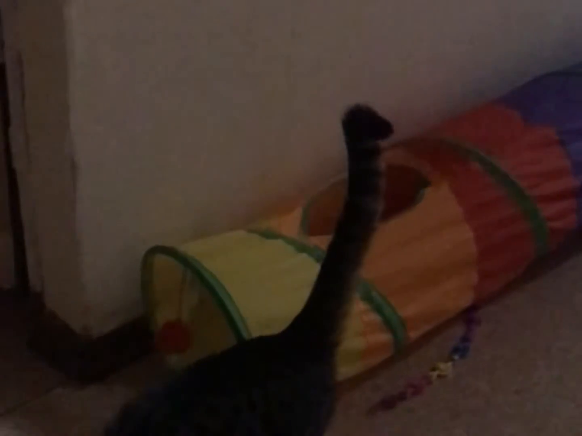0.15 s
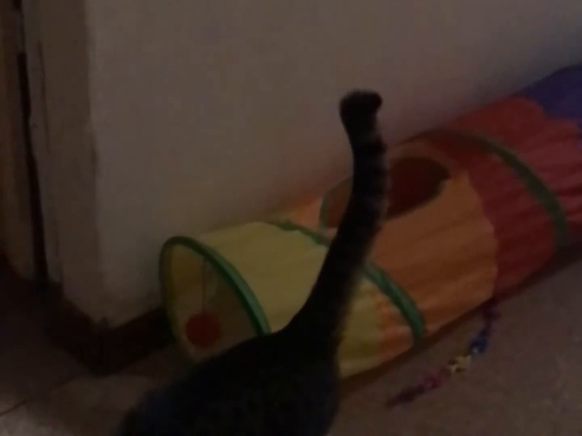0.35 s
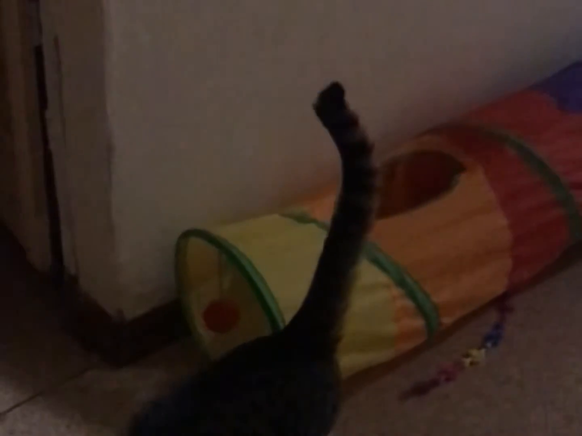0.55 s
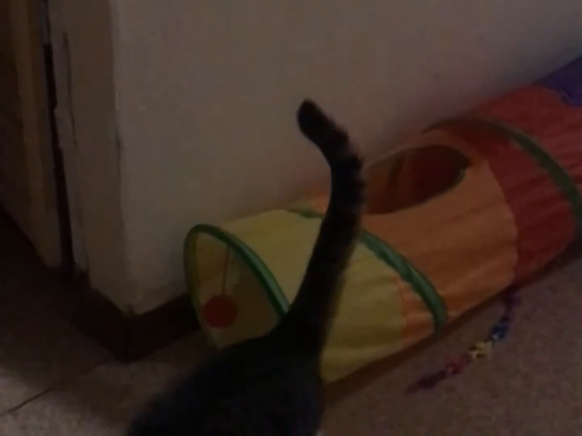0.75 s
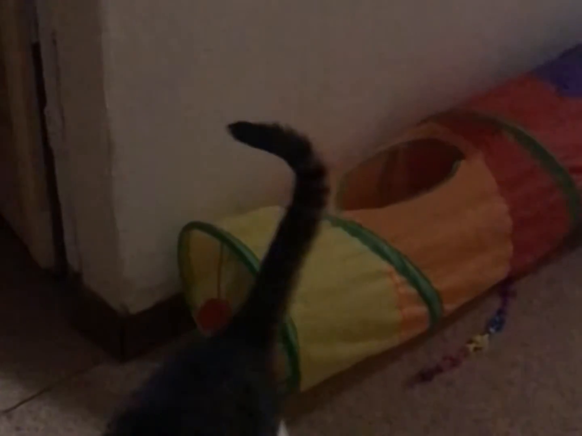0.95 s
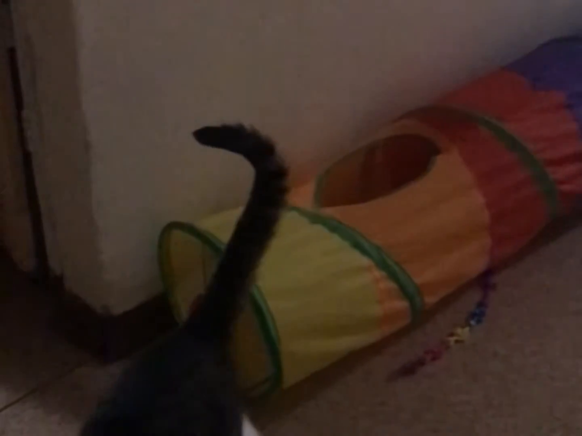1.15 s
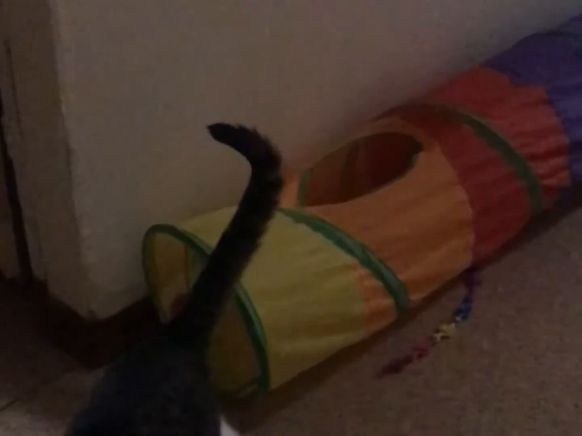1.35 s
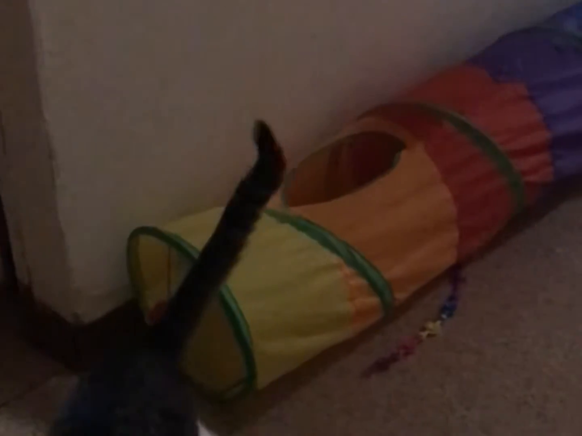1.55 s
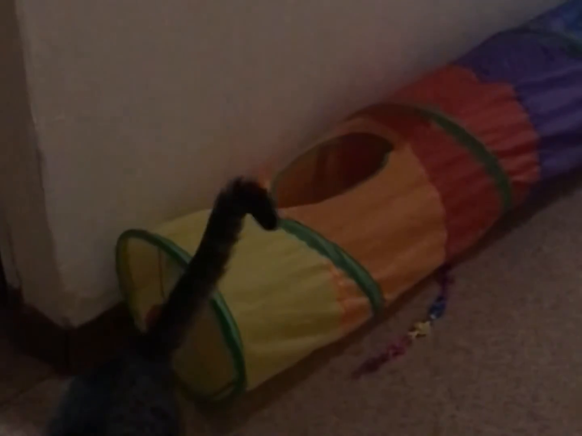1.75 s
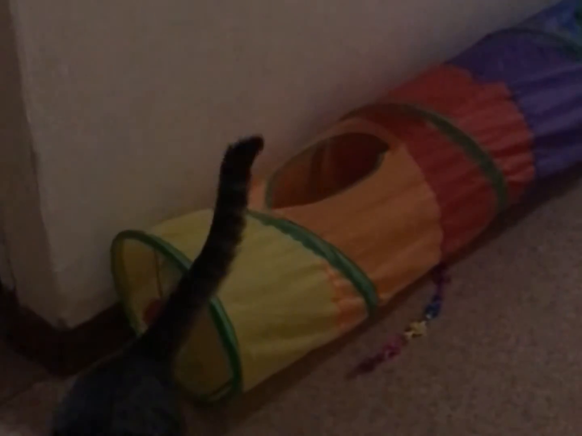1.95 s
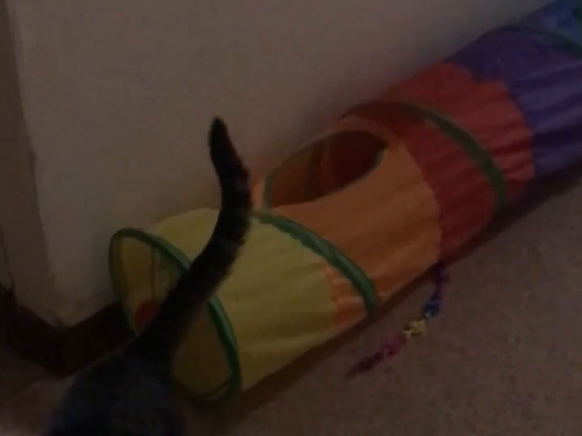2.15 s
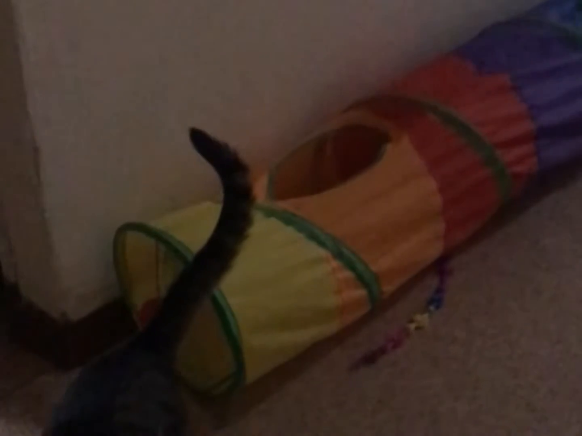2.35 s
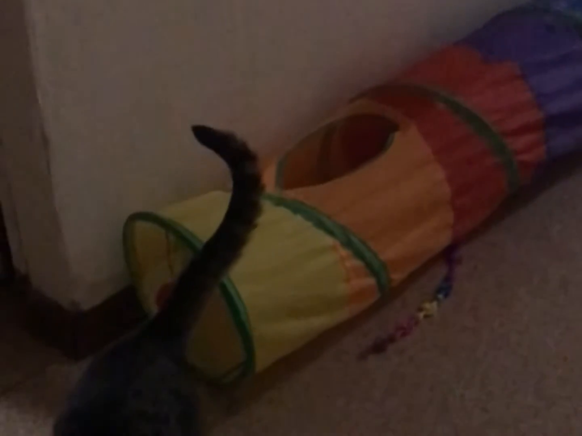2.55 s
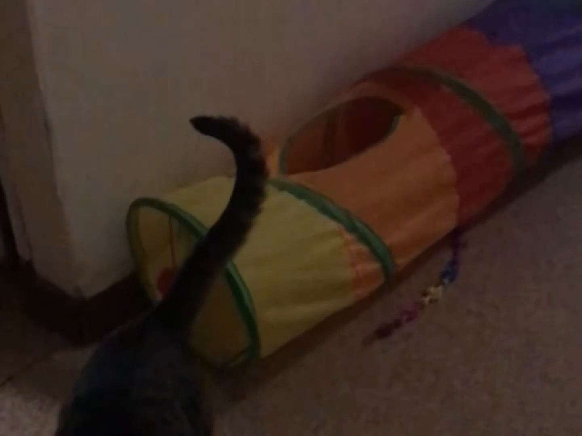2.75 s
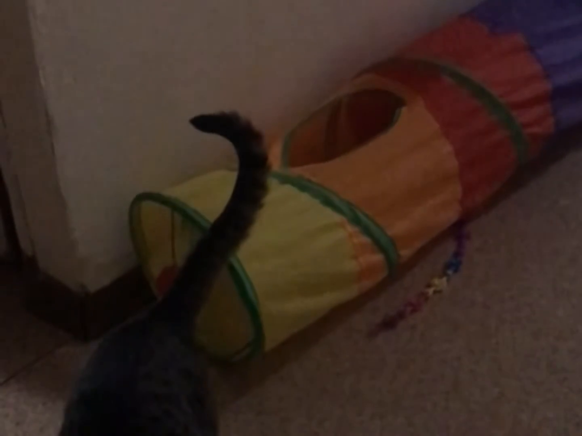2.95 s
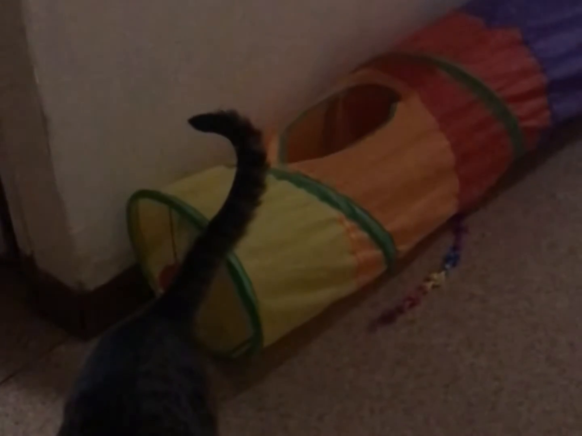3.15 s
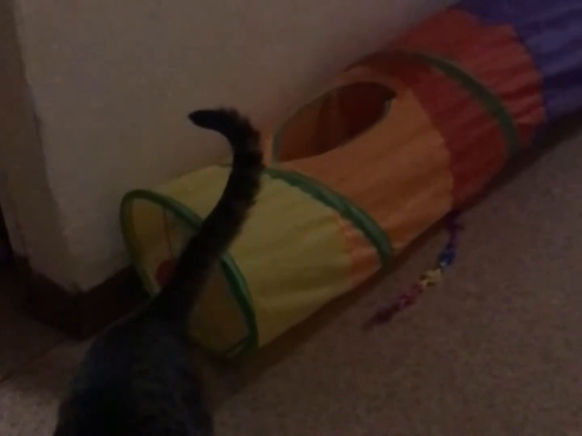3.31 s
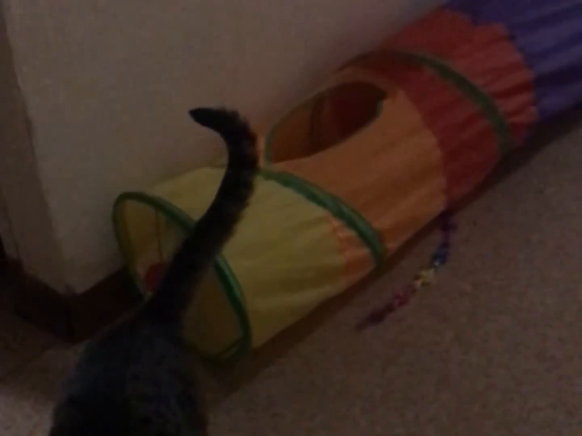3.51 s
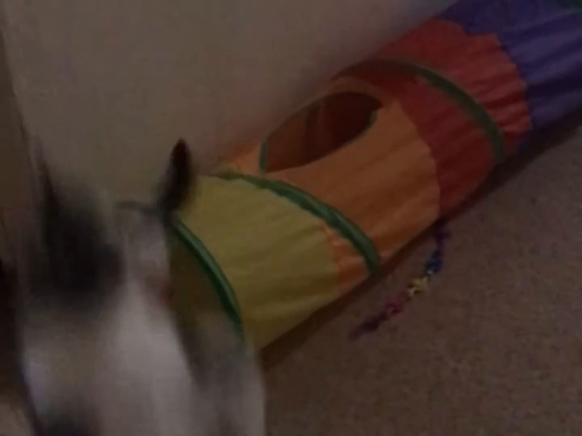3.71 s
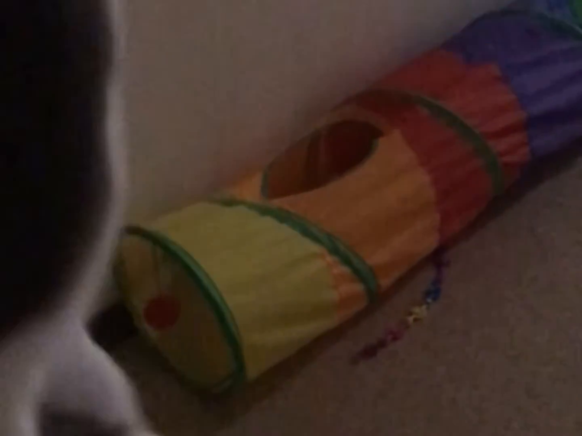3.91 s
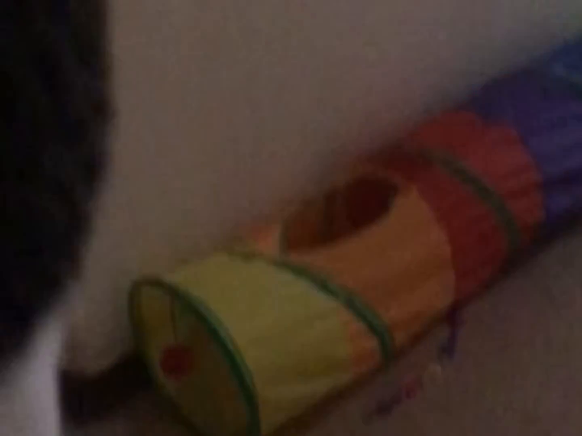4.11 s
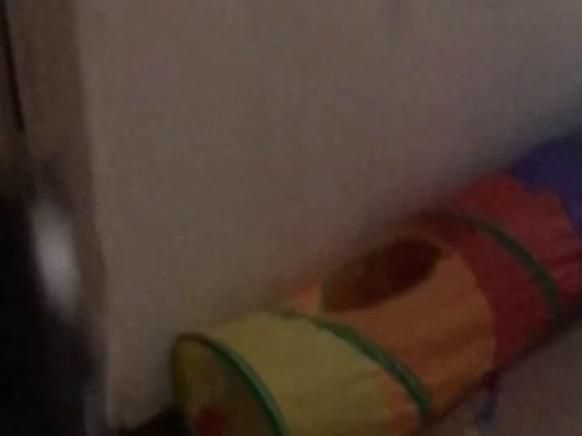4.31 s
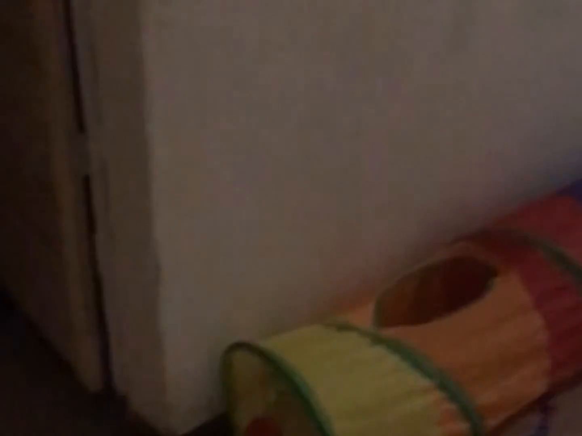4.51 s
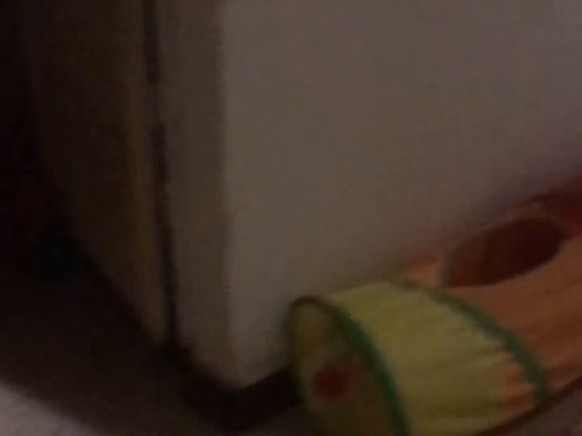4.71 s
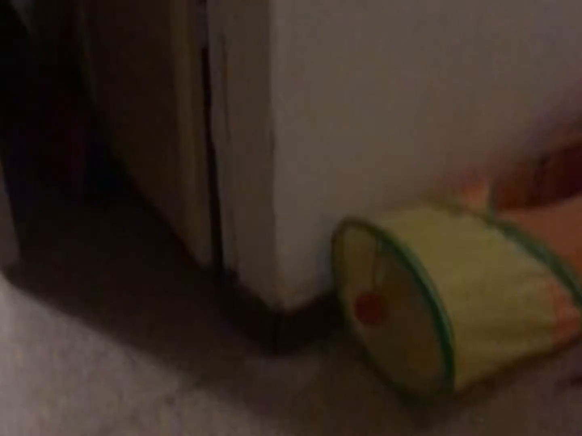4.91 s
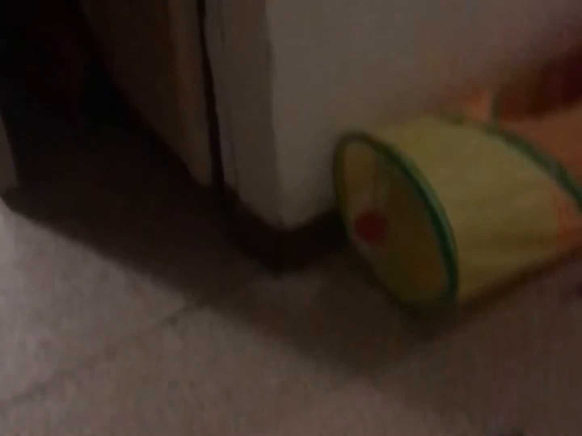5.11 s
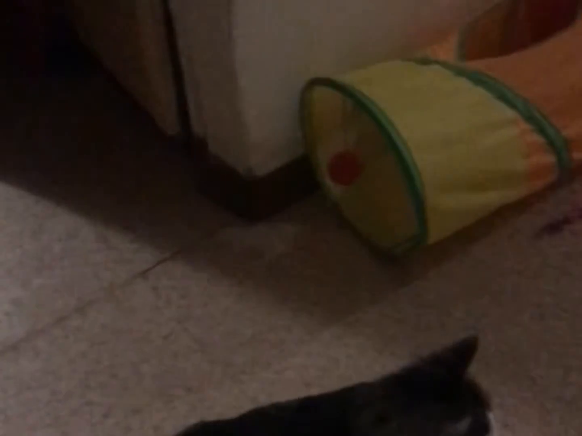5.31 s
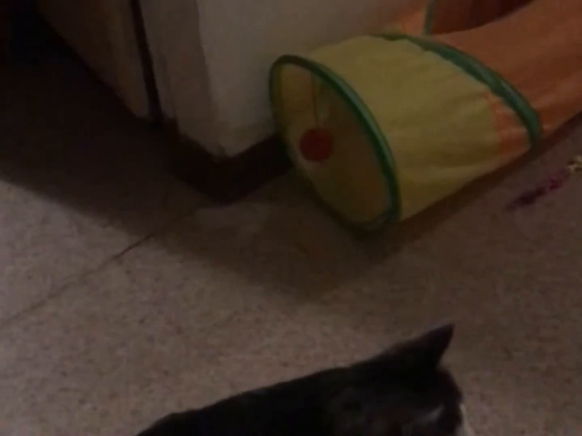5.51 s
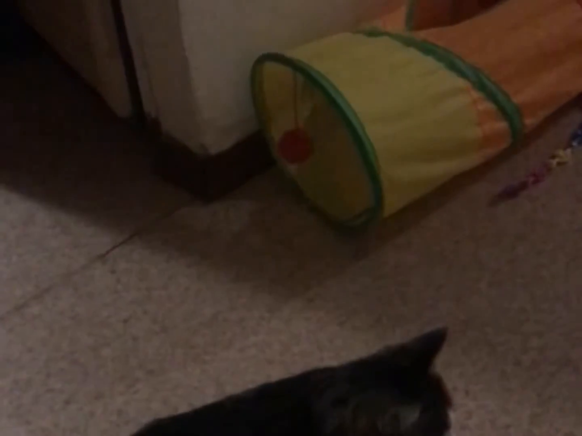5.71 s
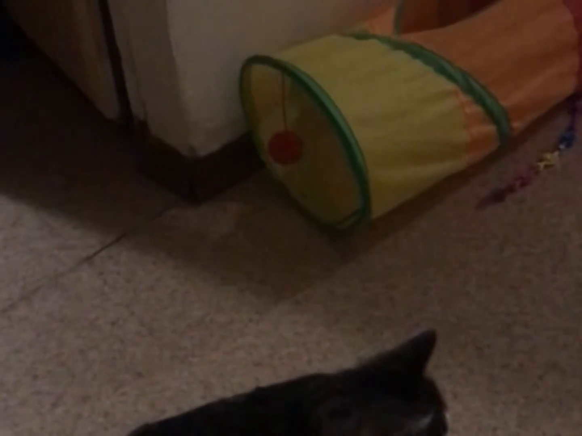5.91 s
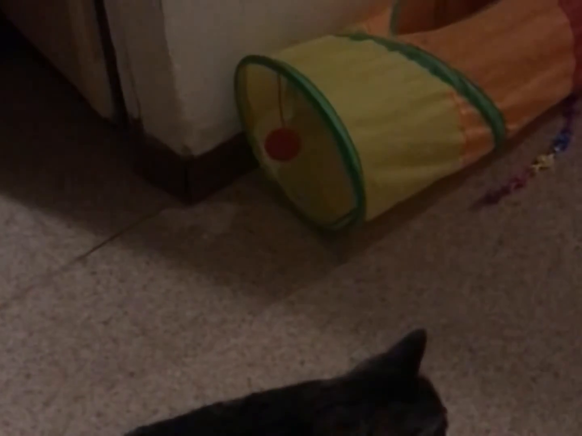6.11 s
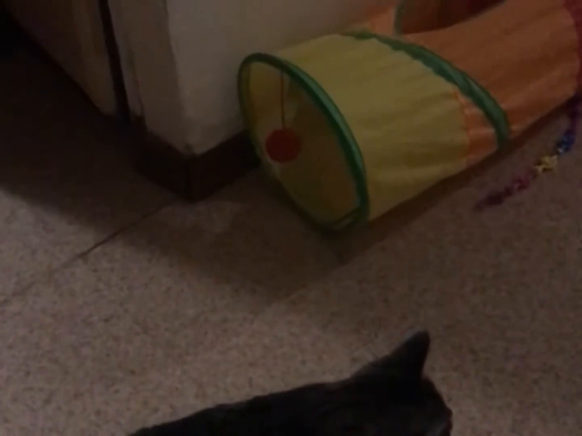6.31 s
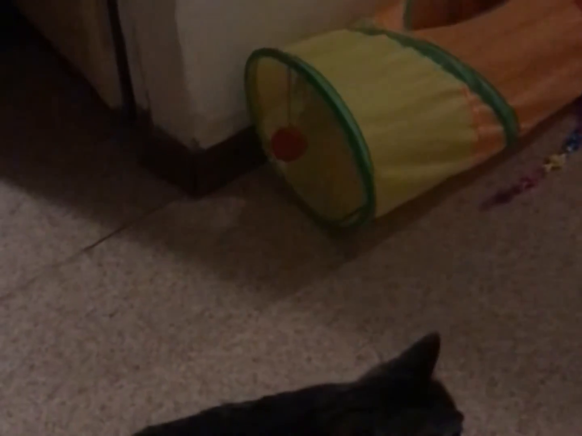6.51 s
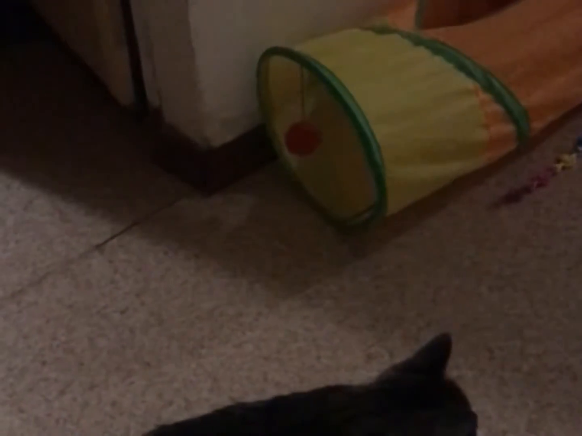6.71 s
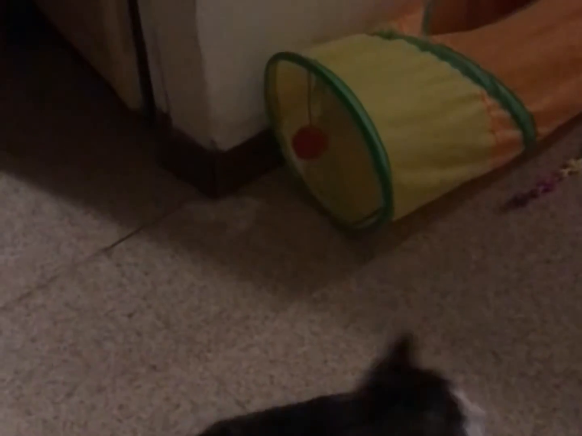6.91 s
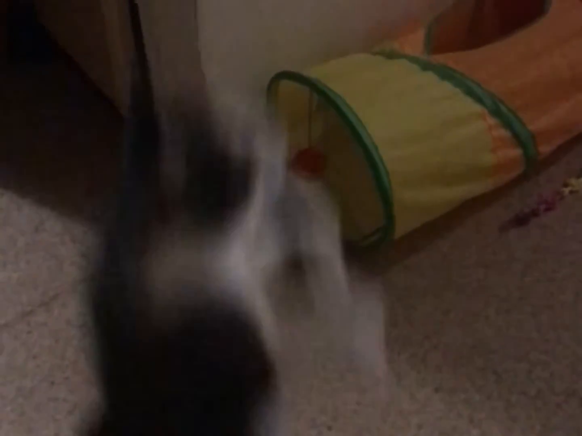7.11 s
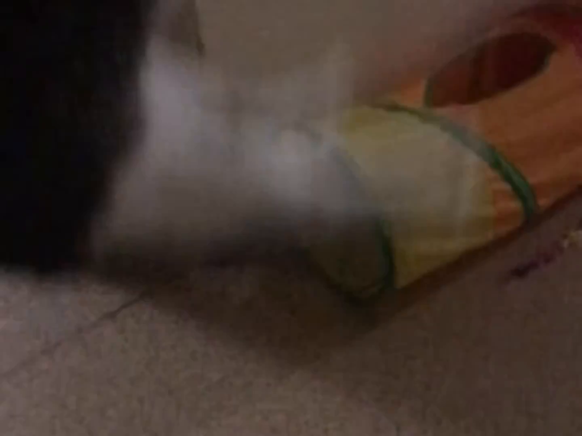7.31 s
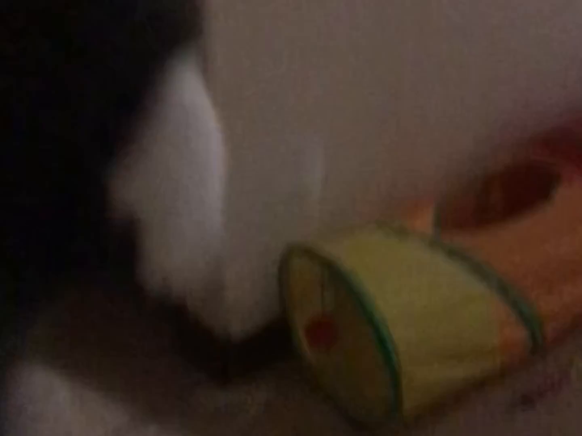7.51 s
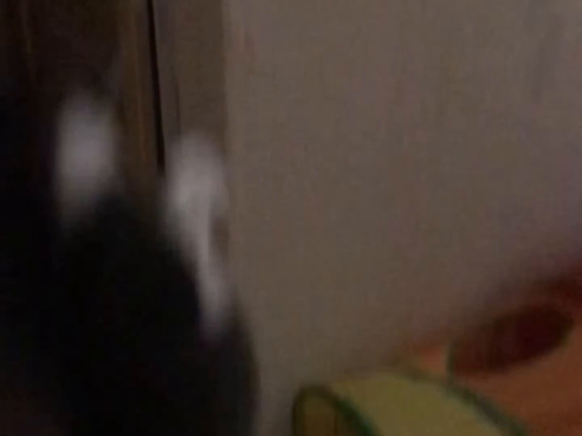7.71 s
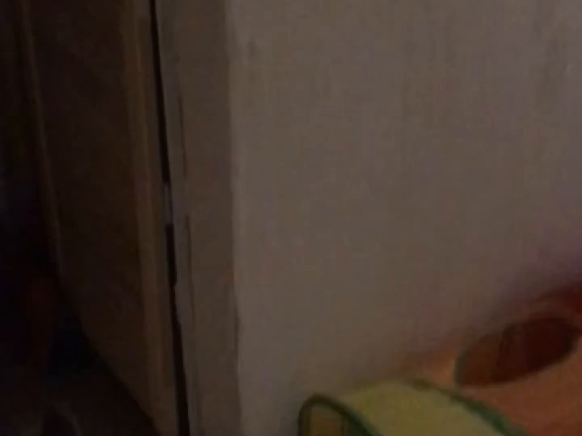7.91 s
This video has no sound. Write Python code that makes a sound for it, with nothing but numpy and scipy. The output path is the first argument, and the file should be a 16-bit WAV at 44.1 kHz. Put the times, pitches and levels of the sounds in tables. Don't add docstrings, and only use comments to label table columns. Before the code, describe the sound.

Close in a hard hallway, cats make tiny bright claw ticks, cloth snaps and faint fur rustle over low air hiss. Soft paw thuds lead to a sudden hollow door bang with latch clatter just past the middle. Quiet scratching and small ringing taps follow, then paw thumps and a second booming bang at the very end. One handheld microphone, mono.

```python
import sys
import numpy as np
from scipy import signal
from scipy.fft import rfft, irfft
from scipy.io import wavfile
from scipy.ndimage import uniform_filter1d

SR = 44100
rng = np.random.default_rng(int(sys.argv[2]) if len(sys.argv) > 2 else 0)


def decibels_to_gain(level_db):
    exponent = np.asarray(level_db, float) / 20
    return 10 ** exponent


def log_audio(samples):
    frames = np.atleast_2d(samples).T
    limited = np.clip(frames, -1, 1)
    pcm = np.round(limited * 32767).astype(np.int16)
    wavfile.write(sys.argv[1], SR, pcm)


N = 350595

# [t/s, peak/dB, brightest f/Hz, weight below 3 kHz/dB]
CLAW_TICKS = [(0.069, -50, 3940, -14), (0.447, -46.5, 6160, -20), (1.216, -50, 8520, -24),
              (1.765, -50.5, 4970, -32), (1.8237, -52.5, 4360, -26), (1.8577, -56, 11900, -23),
              (1.889, -48.5, 12400, -22), (2.0497, -50, 5660, -10), (2.33, -46.5, 6000, -36),
              (2.439, -46, 5450, -21), (2.749, -51, 8230, -19), (3.292, -53, 5540, -23),
              (3.322, -52.5, 7100, -30), (3.5373, -43.5, 6140, -15), (3.6714, -51.5, 4160, -1),
              (3.84, -49, 3930, -11), (3.9544, -62, 3520, 2), (5.7893, -60, 6600, -21),
              (5.871, -52, 3990, -15), (6.399, -46.5, 4330, -13), (6.5196, -45.5, 6240, -10)]
# [t/s, peak/dB, brightest f/Hz, weight below 3 kHz/dB, hall tail/dB]
CLAW_SNAPS = [(0.24, -43, 4700, -24, -24), (0.3978, -39, 6340, -17, -19), (0.5805, -38, 6820, -27, -28),
              (1.243, -40.5, 12700, -31, -30), (1.297, -36, 13400, -32, -24), (1.519, -43, 12400, -19, -25),
              (1.658, -37.5, 7700, -34, -25), (2.3747, -37, 5750, -34, -28), (2.455, -37, 9100, -27, -25.5),
              (3.4092, -36, 6160, -19, -27), (3.4958, -31.5, 6100, -6, -27), (3.5113, -35, 11600, -12, -37),
              (3.9668, -27, 6380, -16, -26.5), (3.9818, -29, 12700, -9, -20),
              (3.9857, -26, 5750, -13, -24.5), (4.847, -34.5, 3100, -17.5, -24.5),
              (5.432, -42, 5150, -21, -23), (5.474, -49, 5370, -26, -15), (5.9, -37, 8600, 5, -16),
              (6.3261, -38, 5600, -23, -33), (6.423, -44.5, 3080, -11, -18.5), (7.225, -44, 4100, -2, -22),
              (7.4283, -34.5, 12800, -14, -19), (7.4458, -27, 9360, -9, -25)]
# [t/s, peak/dB, brightest f/Hz, weight below 3 kHz/dB, hall tail/dB]
CLAW_CATCHES = [(.144, -50, 8500, -30, -23), (.231, -44, 11000, -30, -22), (2.321, -50, 6500, -30, -28),
                (2.346, -52, 4900, -25, -28), (2.472, -52, 9600, -30, -28), (2.795, -51, 11500, -30, -30),
                (3.428, -52, 4500, -20, -25), (3.832, -55, 11000, -30, -18), (3.872, -53, 4000, -20, -29),
                (3.994, -43, 6200, -15, -30), (6.343, -53, 4500, -18, -26), (7.317, -59, 9900, -30, -37),
                (7.42, -61, 9900, -30, -33), (7.452, -33, 5760, -21, -23)]
# [t/s, peak/dB, brightest f/Hz, weight below 3
# kHz/dB, weight above 9 kHz/dB]
DOOR_TICKS = [
    (7.8372, -19, 3900, -4, -19),
    (4.4967, -18.5, 5600, -5.5, -23),
    (4.513, -23, 4540, 6, -23),
    (4.542, -22.5, 12500, -30, 4),
    (4.543, -26.5, 6860, -33, -16),
    (4.559, -46, 12500, -25, 1.5),
]
# [t/s, length/s, level/dB, brightest f/Hz, weight below 3 kHz/dB]
SCUFF_STROKES = [(0.219, 0.026, -64, 4840, -17), (0.405, .13, -73.5, 5200, -25),
                 (0.549, 0.034, -71, 6600, -30), (1.214, 0.13, -74, 6900, -14), (0.0, 0.3, -78, 2900, -12),
                 (1.836, 0.07, -73, 11900, -24), (2.232, 0.19, -77, 5930, -30),
                 (2.368, 0.11, -69.5, 5500, -28), (2.74, 0.21, -73.5, 5570, -22),
                 (3.495, 0.11, -69.5, 5900, -19), (3.671, 0.065, -81, 4430, 0),
                 (3.787, 0.12, -83, 4270, 11), (4.863, 0.11, -72.5, 6100, 0),
                 (5.003, 0.41, -82.5, 5900, 13), (5.418, 0.016, -65.5, 4530, -4),
                 (5.463, 0.051, -62.5, 5700, -12), (5.534, 0.062, -67.5, 1900, 5.5),
                 (5.783, 0.027, -66, 6600, -5), (5.901, 0.02, -64, 5130, -7), (6.288, 0.11, -71, 4170, -15),
                 (6.381, 0.14, -76, 3780, -13), (6.481, 0.044, -71, 6000, -20),
                 (7.023, 0.15, -75.5, 4000, -0.5), (7.199, 0.035, -75, 3570, 11)]
# [t/s, length/s, level/dB, centre
# f/Hz, narrowness/0-1]
BAND_SWEEPS = [(0.00101, 0.53, -77, 2200, 0.6), (2.235, 0.1, -77, 6200, 0.9), (2.656, 0.065, -79, 8800, .85),
               (2.753, .045, -79, 5500, .86), (2.81, .03, -86, 5500, .86), (2.852, 0.082, -75.5, 5600, 0.7),
               (3.785, 0.06, -72, 580, .5), (3.51, .08, -78, 12500, .8), (3.822, .025, -78, 13000, .75),
               (3.68, .03, -78, 4300, .7), (5.0, 0.17, -82, 1500, .7), (5.55, 0.061, -58.5, 310, .88),
               (5.542, 0.12, -72.5, 1900, 0.78), (5.55, 0.12, -78, 680, 0.7), (5.472, 0.044, -69, 5400, 0.9),
               (5.541, .11, -70.5, 2400, 0.4), (5.902, 0.061, -68, 5100, .72),
               (6.362, 0.086, -76, 1050, 0.83)]
# [t/s, level/dB]
STIRRING = [(0.0, -67), (0.4, -69), (0.64, -72), (1.5, -74), (1.86, -75.5), (2.15, -74), (2.26, -74),
            (3.3, -74.5), (3.52, -73.5), (4.29, -77), (4.7, -77), (5.05, -69), (5.4, -75.5), (5.93, -70),
            (6.44, -75.5), (6.9, -75), (7.13, -74.5), (7.95, -77)]
# [f/Hz, level/dB per Hz]
CLOTH_COLOUR = [(1180, -34), (2000, -10), (3140, -4), (3980, -5.5), (5920, -2), (7580, -6), (12400, -3.5),
                (15600, -5.5), (16100, -4.5), (16500, -75)]
# [f/Hz, level/dB per Hz]
CLOTH_BODY_COLOUR = [(200, -45), (330, 7), (600, 4.5), (1200, -2), (2500, -8), (4000, -40)]
# [t/s, peak/dB, f/Hz, t60/s,
# fuzziness/0-1]
SMALL_POPS = [(.401, -59, 4500, .2, 1), (.449, -65, 6000, .1, 0.9), (1.659, -54.5, 6800, 0.27, 1),
              (2.1, -66, 5900, 0.29, 0.8), (3.985, -42, 950, 0.043, 1), (4.496, -37, 400, .12, 1),
              (4.4945, -33, 1590, .06, 0.2), (4.495, -37, 2560, .06, 1), (5.55, -57, 560, 0.18, 0.9),
              (5.792, -60, 2560, 0.16, 0.9), (5.797, -55.5, 6000, 0.14, 0.8), (5.901, -55, 2100, 0.19, 0.9),
              (7.431, -62, 4200, 0.47, 0.9), (7.446, -56, 3200, 0.35, 0.9), (7.447, -55, 1910, .12, 1),
              (7.838, -47, 4150, 0.39, .95), (7.8385, -29, 1010, 0.051, 1), (7.843, -29.5, 327, 0.26, 1)]
# [t/s, peak/dB, f/Hz, t60/s, fuzziness/0-1]
BRIEF_FLECKS = [(.069, -58, 8500, .012, 1), (2.049, -55, 5600, .008, .6), (3.322, -53, 7100, .008, .6),
                (3.576, -47, 12000, 0.013, 1), (3.938, -60, 14000, .01, 1), (3.955, -56, 13500, .012, 1),
                (4.143, -63, 13500, .012, 1), (4.169, -63, 13500, .012, 1), (4.245, -60, 13500, .012, 1),
                (5.703, -50.5, 2060, 0.035, 0.7), (3.582, -45, 475, .05, 0.4), (3.676, -53, 600, .04, .6),
                (3.841, -52, 3900, .015, .8), (3.872, -56, 4200, .012, .8), (3.905, -56, 420, 0.037, .6),
                (5.806, -58, 2790, .06, .5), (6.689, -55, 13800, .012, 1), (6.866, -61, 12600, .012, 1),
                (7.0566, -60, 6100, .015, 1), (7.112, -59, 8200, .015, 1), (7.215, -50, 6070, 0.019, 1),
                (7.3, -63, 14000, .01, 1), (7.373, -61, 12300, .01, 1), (7.624, -62, 13000, .012, 0.7),
                (7.7238, -60, 13800, .02, 1), (7.931, -58, 12500, .012, 1)]
# [t/s, peak/dB, f/Hz, t60/s, fuzziness/0-1]
SMALL_RINGS = [
    (5.708, -64, 2110, 0.25, 1),
    (5.787, -56, 2780, 0.16, 0.66),
    (5.897, -43.5, 2370, 0.22, 0.85),
    (5.916, -47.5, 2336, 0.3, 0.84),
    (7.172, -59, 1560, 0.09, 1),
    (5.543, -49, 308, 0.16, 0.44),
    (5.896, -53, 552, 0.17, 0.47),
    (5.902, -58, 1130, 0.51, 0.9),
]
# [t/s, peak/dB, floor f/Hz, t60/s, slap at 200-800 Hz/dB]
PAW_LANDINGS = [(0.038, -55.5, 119, 0.17, -12), (0.838, -53.5, 71.5, 0.13, -21),
                (1.705, -52.5, 118.5, 0.25, -11), (3.581, -46, 117.5, 0.32, -9.5),
                (3.696, -39, 106, 0.12, -40), (3.738, -49.5, 83.4, 0.15, -13.5),
                (3.832, -32, 128.4, 0.19, -23), (3.9, -52.5, 129, 0.49, -11.5),
                (4.811, -36, 84.4, 0.2, -32.5), (4.948, -49, 129, 0.17, -22.5),
                (5.898, -53, 72.4, 0.19, -20), (6.572, -57.5, 107.4, 0.37, -10.5),
                (6.971, -45, 87.6, 1, -26), (7.031, -34, 129, 0.27, -31), (7.091, -57.5, 106.6, 1, -12),
                (7.217, -32.5, 85.5, 0.23, -26.5), (7.258, -39, 93, 0.14, -30),
                (7.33, -47.5, 74.5, 0.12, -30), (7.907, -16.5, 110.5, 0.15, -25)]
# [t/s, boom/dB, crack/dB, hall tail/dB, contact/s]
DOOR_BANGS = [
    (4.4926, -13, -19.5, -31, 0.016),
    (7.836, -12, -24, -36.5, 0.011),
]
# [f/Hz, first/dB, second/dB, t60/s]
DOOR_MODES = [(49.4, -13, -14, 0.34), (83.7, -10.5, -12.5, 0.32), (115.4, -10, -5, 0.37),
              (129, 3, 2.5, 0.22), (175.5, -12.5, -12, 0.29), (231.9, -11.5, -14, 0.28),
              (292.6, -18.5, -10, 0.2), (350, -24, -22, 0.18), (420, -27, -26.5, 0.31),
              (473.5, -26, -31, 0.28), (539, -35, -24.5, 0.14), (686, -14, -24.5, 0.096),
              (800, -14, -46, 0.1), (871, -39, -27, 0.23), (1082, -30, -35.5, 0.39),
              (1167, -44, -31, 0.087), (1624, -33, -46, 0.35), (2570, -49, -53, 0.13)]
# [f/Hz, level/dB per Hz]
CRACK_COLOUR = [(180, -25), (300, 17.5), (1640, -15), (2070, -36), (2610, 10.5), (3580, -19), (5430, -11),
                (7320, -23), (16000, -39)]
# [f/Hz, level/dB per Hz]
HALL_TAIL_COLOUR = [(150, -31), (230, 2.5), (400, -13), (560, -10), (800, -13.5), (1200, -14),
                    (2000, -26.5), (2800, -25), (4500, -30.5), (7000, -40.5), (15000, -62)]
# [f/Hz, t60/s]
HALL_DECAY = [(200, 0.4), (500, 0.55), (1100, 0.48), (2000, 0.55), (3000, 0.5), (5000, 0.46), (9000, 0.68)]
# [t/s, peak/dB, floor f/Hz, t60/s, slap at 200-800 Hz/dB]
SETTLING = [
    (4.655, -40, 132, 0.2, -33),
    (6.7, -66, 193.6, .5, -28),
    (6.86, -65, 190, .4, -30),
]
# [t/s, peak/dB, floor f/Hz, t60/s, slap
# at 200-800 Hz/dB]
STEPS_AND_PUSHES = [
    (1.963, -44.5, 51.3, 0.4, -41),
    (2.687, -37.5, 51.4, 0.37, -47),
    (2.753, -51.5, 49.1, 0.57, -47),
    (3.361, -40.5, 54, 0.39, -50),
    (4.031, -46, 36, 0.42, -25),
    (4.5145, -19.5, 123, 0.1, -34.5),
    (5.356, -49, 43.9, 0.39, -19),
    (6.055, -44.5, 47.6, 0.44, -44),
    (6.762, -45, 48.5, 0.32, -32),
    (6.98, -57.5, 202.4, 0.67, -19),
]
# [t/s, level/dB, hold/s]
BUILDING_JOLTS = [(0.0, -64.5, 0.28), (0.8, -71, 0.6), (1.7, -69, 0.065), (2.05, -66.5, 0.3),
                  (2.66, -53, 0.061), (2.9, -71.5, 0.93), (3.5, -56, 0.46), (4.49, -39.5, 0.047),
                  (4.67, -47.5, 0.05), (5.35, -63, 0.11), (6.19, -65.5, 0.037), (6.72, -63.5, 0.32),
                  (6.99, -49.5, 0.046), (7.29, -60.5, 0.21), (7.6, -68.5, 0.13), (7.85, -50, .2)]
# [f/Hz, level/dB per Hz]
BUILDING_COLOUR = [(8.8, -44), (15, -17.5), (37, 2.5), (57, 4.5), (82, 1.5), (98, -12), (129, -9.5),
                   (160, -20.5), (210, -74), (350, -120)]
# [t/s, length/s, level/dB]
DRONE_PASSES = [
    (0.587, 0.21, -68),
    (2.926, 0.37, -64),
]
# [f/Hz, level/dB per Hz]
HISS_COLOUR = [(47, -5.5), (80, -4), (140, -6), (381, -13.5), (498, -19), (994, -18.5), (2030, -26),
               (4330, -27), (4950, -38), (6050, -38), (9440, -34), (10300, -38.5), (12300, -36),
               (15100, -32.5), (16500, -40)]
# [f/Hz, level/dB]
MICROPHONE_EDGE = [(9700, .1), (10400, -5), (11100, .1), (15650, .1), (15800, -3), (15950, -20),
                   (16600, -30), (16750, -60)]

SNAP_HZ = 5900
SNAP_TOP_DB = -7.5


def evened(x):
    return x / np.sqrt(np.mean(x ** 2) + 1e-20)


def read(points, hz):
    f, value = np.transpose(points)
    return np.interp(np.log(hz + 1), np.log(f + 1), value)


def add(mix, s, sound):
    part = mix[round(s * SR):][:len(sound)]
    part += sound[:len(part)]


def coloured(x, points):
    gain = decibels_to_gain(read(points, np.fft.rfftfreq(len(x), 1 / SR)))
    return evened(irfft(rfft(x) * gain, len(x)))


def fade(t, rise, t60):
    swell = 1 - np.exp(-(t / np.clip(rise, 1e-4, 1)) ** 2)
    return swell * decibels_to_gain(-60 * t / np.maximum(t60, 1e-3))


def wander(count, first, second):
    return evened(uniform_filter1d(uniform_filter1d(rng.standard_normal(count), first), second))


def held(rows, rest_db, rise, t60):
    t = np.arange(N) / SR
    power = decibels_to_gain(rest_db) ** 2
    for s, db, hold in rows:
        fall_db = -60 * np.maximum(t - s - hold, 0) / t60
        power = power + (decibels_to_gain(db + fall_db) * fade(np.maximum(t - s, 0), rise, t60=np.inf)) ** 2
    return np.sqrt(power)


def hump(x, hz):
    return coloured(x, [(hz * 0.59, -40), (hz * 1.02, -3), (hz * 1.06, -3), (hz * 1.2, -40)])


def patchy(z, chance, depth_db):
    across = uniform_filter1d(np.resize(chance, z.shape), size=2, axis=0)
    return z * decibels_to_gain(depth_db * evened(uniform_filter1d(across, size=5, axis=1)))


def ticks(rows):
    out, t = np.zeros(N), np.arange(16384) / SR
    for s, db, hz, low_db, top_db, tail_db in rows:
        noise = rng.standard_normal(len(t))
        middle_db = -2.5 - 1.8 * np.log2(hz / SNAP_HZ)
        colour = [(400, low_db), (1200, low_db + 2.5), (2200, low_db + 10.0), (3300, middle_db),
                  (6500, -4.0), (9000, top_db + 4.5), (17000, top_db + 0.5)]
        fizz = noise * fade(t - .002, 0.00022, 0.011) * (t > .002)
        burst = fizz + 3.5 * (np.arange(len(t)) == 100)
        snap, tail = (evened(coloured(x, colour) + 0.32 * hump(x, hz)) for x in (burst, noise))
        sound = snap / abs(snap).max() + decibels_to_gain(tail_db) * tail * fade(t, 0.0022, 0.34)
        add(out, s - .0026, decibels_to_gain(db - 4.5) * sound)
    return out


def claws_and_latch():
    rows = [(*row, -17, -4) for row in CLAW_TICKS]
    rows += [(*row, SNAP_TOP_DB) for row in CLAW_SNAPS]
    claws = [(s, db, hz, low_db, top_db + 1.5 * np.log2(hz / SNAP_HZ), tail_db)
             for s, db, hz, low_db, tail_db, top_db in rows]
    return ticks(sorted(claws) + [(*row, -27.5) for row in DOOR_TICKS])


def catches():
    return ticks([(s, db, hz, low_db, SNAP_TOP_DB + 4.0 * np.log2(hz / SNAP_HZ), tail_db)
                  for s, db, hz, low_db, tail_db in CLAW_CATCHES])


def fibres(count, soft=1.1):
    size = rng.exponential(1, count)
    fizz, chance, brush = rng.standard_normal((3, count))
    slips = decibels_to_gain(1.9 * np.minimum(size, 3.5)) * (abs(chance) < 500 / SR)
    return evened(fizz * signal.lfilter([1], [1, -.97], slips)) + soft * brush


def scuffs():
    out, t = np.zeros(N), np.arange(16384) / SR
    for s, length, db, hz, low_db in SCUFF_STROKES:
        slips = fibres(len(t), soft=1.7)
        tone = coloured(slips, CLOTH_COLOUR) + decibels_to_gain(-14.5) * hump(slips, hz)
        tone += decibels_to_gain(low_db) * coloured(slips, CLOTH_BODY_COLOUR)
        clumps = decibels_to_gain(3.5 * wander(len(t), 400, 300))
        release = decibels_to_gain(-60 * np.maximum(t - length, 0) / 0.27)
        add(out, s, decibels_to_gain(db) * tone * clumps * fade(t, 0.0096, 1.0) * release)
    return out


def sweeps():
    out, t = np.zeros(N), np.arange(16384) / SR
    for s, length, db, hz, narrow in BAND_SWEEPS:
        edge = np.clip(narrow, .2, .95)
        brushing = fibres(len(t)) + 1.8 * rng.standard_normal(len(t))
        band = coloured(brushing, [(hz * edge ** 3, -40), (hz * edge, -4), (hz, 0), (hz / edge, -4),
                                   (hz / edge ** 3, -40)])
        clumps = decibels_to_gain(1.5 * wander(len(t), 200, 150))
        arch = np.sin(np.pi * np.clip(t / length, 0, 1) ** 0.58)
        add(out, s, decibels_to_gain(db) * band * clumps * arch)
    return out


def rustle():
    s, db = np.transpose(STIRRING)
    stir_db = np.interp(np.arange(N) / SR, s, db) - 4.0
    body = coloured(rng.standard_normal(N), CLOTH_BODY_COLOUR)
    fur = coloured(evened(fibres(N, soft=1.7)), CLOTH_COLOUR)
    return decibels_to_gain(stir_db) * (fur + decibels_to_gain(-5) * body)


def rings(rows, trail, spread, size=16384):
    out, t = np.zeros(N), np.arange(size) / SR
    for s, db, hz, t60, fuzz in rows:
        cluster = coloured(rng.standard_normal(size), [
            (hz * .6, -40), (hz * (.9 - spread), -14), (hz * (1 - spread), 0), (hz * (1 + spread), 0),
            (hz * (1.12 + spread), -14), (hz * 1.8, -40), (hz * 3.5, -85)])
        tone = (1 - fuzz) * np.sin(2 * np.pi * hz * t) + 0.32 * fuzz * cluster
        struck = tone * fade(t, 1.44 / hz, t60)
        add(out, s, decibels_to_gain(db) * (struck + trail * cluster * fade(t, 0.039, 0.67)))
    return out


def thuds(rows, beat, rise):
    out, t = np.zeros(N), np.arange(32768) / SR
    for s, db, hz, t60, slap_db in rows:
        pair = np.sin(2 * np.pi * hz * t) + 0.49 * np.sin(2 * np.pi * hz * beat * t)
        slap = coloured(rng.standard_normal(len(t)), [(100, -5.0), (200, 5.5), (450, -5.0), (900, -21.0),
                                                      (2500, -32.0), (6000, -68)])
        floor = pair * fade(t, rise * t60, t60)
        add(out, s, decibels_to_gain(db + 3) * (floor + decibels_to_gain(slap_db) * slap * fade(t, 0.0016, 0.41)))
    return out


def door_boom(t, bang, contact):
    sag, sag_s = 0.214, 0.0114
    bent = t + sag * sag_s * (1 - np.exp(-t / sag_s))
    boom = np.zeros(len(t))
    for k, (hz, *db, t60) in enumerate(DOOR_MODES):
        split, turn = rng.random(2)
        twin = 0.71 * (hz > 150) * np.sin(2 * np.pi * (hz * (1 + 0.0826 * (split + 0.254)) * t + turn))
        ring = fade(t, contact * (120 / hz) ** 0.19, t60)
        boom += (-1) ** k * decibels_to_gain(db[bang]) * (np.sin(2 * np.pi * hz * bent) + twin) * ring
    return boom


def hall_tail(noise, chance):
    hz, frame_t, z = signal.stft(coloured(noise, HALL_TAIL_COLOUR), SR, nperseg=512)
    decay = decibels_to_gain(-60 * frame_t / read(HALL_DECAY, hz)[:, None])
    return signal.istft(patchy(z, chance, 3.5) * decay, SR, nperseg=512)[1][:len(noise)]


def bangs():
    out, t = np.zeros(N), np.arange(36864) / SR
    for bang, (s, boom_db, crack_db, tail_db, contact) in enumerate(DOOR_BANGS):
        latch, air = rng.standard_normal((2, len(t)))
        crack = coloured(latch, CRACK_COLOUR) * fade(t, 0.001, contact)
        tail = hall_tail(air, latch) * fade(t, 0.009, 3.8)
        add(out, s, decibels_to_gain(boom_db) * door_boom(t, bang, contact) + decibels_to_gain(crack_db) * crack + decibels_to_gain(tail_db) * tail)
    return out


def rumble():
    shake = held(BUILDING_JOLTS, rest_db=-75, rise=0.022, t60=0.87)
    return shake * coloured(rng.standard_normal(N), BUILDING_COLOUR)


def drone():
    hz = 70 + 1.56 * wander(N, 3000, 3000)
    passes = [(s, db + 2.5, hold) for s, hold, db in DRONE_PASSES]
    return held(passes, rest_db=-80, rise=0.046, t60=0.45) * np.sin(2 * np.pi * np.cumsum(hz) / SR)


def motor():
    return decibels_to_gain(-71 + 2.4 * wander(N, 9000, 9000)) * np.sin(2 * np.pi * 48 * np.arange(N) / SR)


def hiss():
    return decibels_to_gain(-71) * coloured(rng.standard_normal(N), HISS_COLOUR)


def in_the_air(steady):
    z = signal.stft(steady, nperseg=512)[2]
    return signal.istft(patchy(z, rng.standard_normal(z.size), 1.5), nperseg=512)[1][:N]


def scene():
    cats = rustle() + scuffs() + claws_and_latch() + rings(SMALL_RINGS, trail=0.04, spread=.05)
    cats += thuds(PAW_LANDINGS, beat=0.77, rise=0.053)
    door = bangs()
    house = thuds(STEPS_AND_PUSHES, beat=0.794, rise=0.051) + rumble()
    noise = hiss()
    house += drone() + motor()
    small = catches() + sweeps() + rings(SMALL_POPS, trail=.02, spread=0.051)
    door += thuds(SETTLING, beat=.85, rise=.1)
    air = in_the_air(noise)
    flecks = rings(BRIEF_FLECKS, trail=.003, spread=0.1, size=2048)
    return (cats + door + small + flecks + house + air)[None]


def roll_off(x):
    return signal.sosfilt(signal.butter(12, 16640, fs=SR, output="sos"), x)


def record(dry):
    wide = np.concatenate([dry, dry[:, ::-1]], axis=1)
    gain = decibels_to_gain(read(MICROPHONE_EDGE, np.fft.rfftfreq(2 * N, 1 / SR)))
    edged = irfft(rfft(wide) * gain, 2 * N)[:, :N]
    left_s = np.arange(N)[::-1] / SR
    return roll_off(edged * np.sin(np.pi / 2 * np.clip(left_s / .005, 0, 1)))


dry = scene()
out = record(dry)
log_audio(out)
```